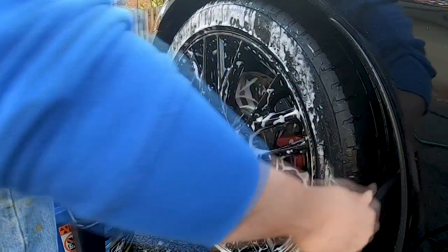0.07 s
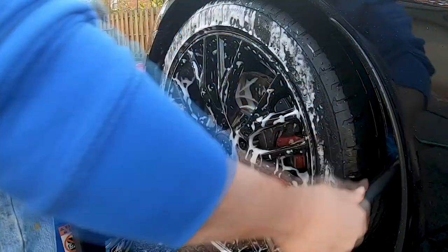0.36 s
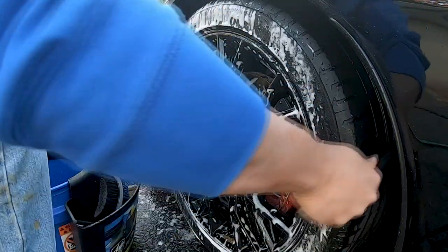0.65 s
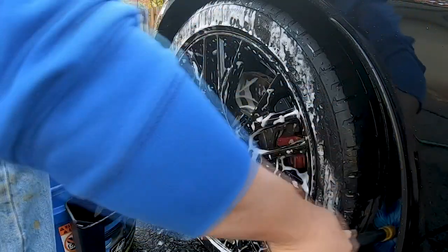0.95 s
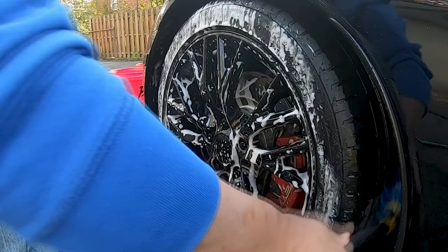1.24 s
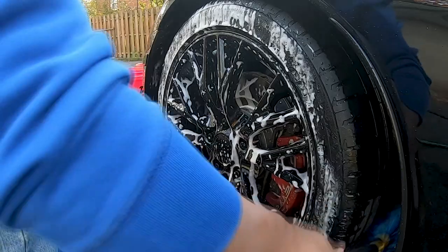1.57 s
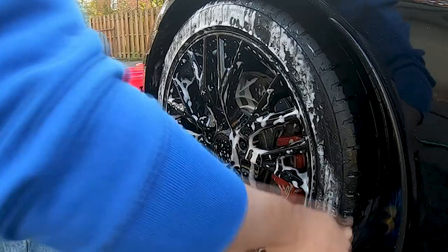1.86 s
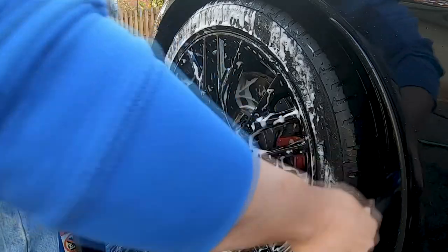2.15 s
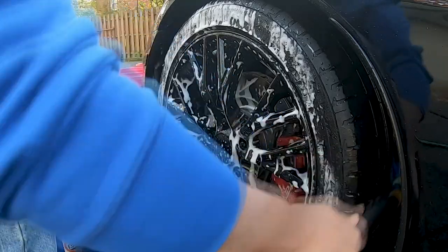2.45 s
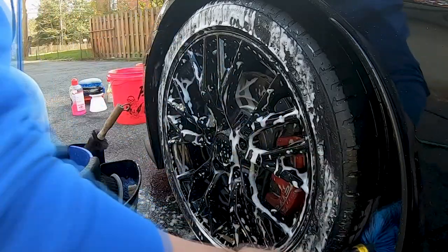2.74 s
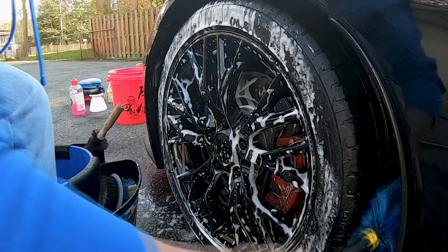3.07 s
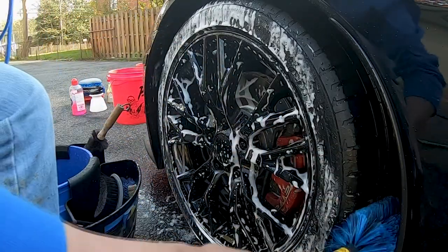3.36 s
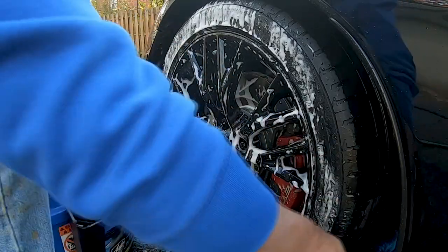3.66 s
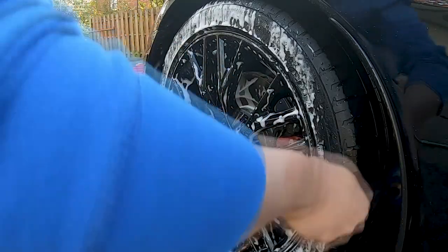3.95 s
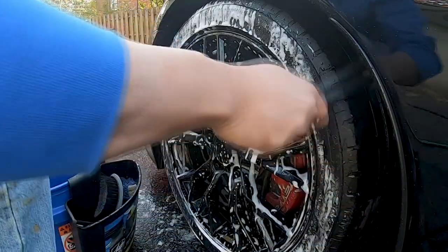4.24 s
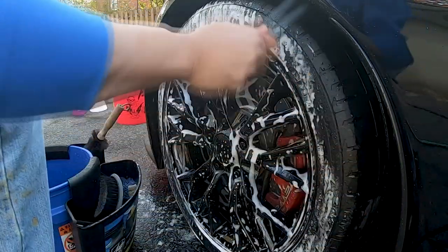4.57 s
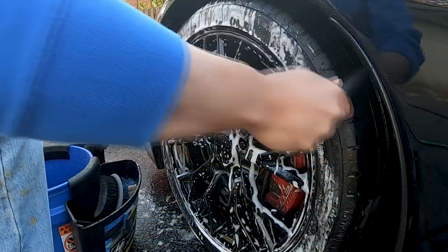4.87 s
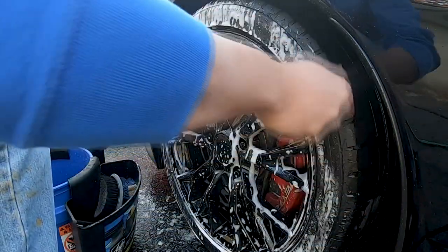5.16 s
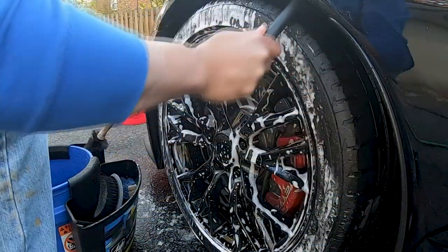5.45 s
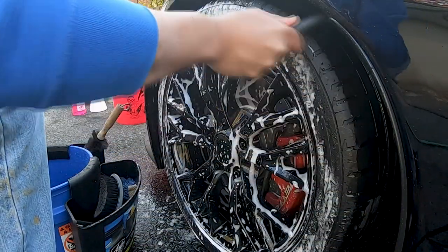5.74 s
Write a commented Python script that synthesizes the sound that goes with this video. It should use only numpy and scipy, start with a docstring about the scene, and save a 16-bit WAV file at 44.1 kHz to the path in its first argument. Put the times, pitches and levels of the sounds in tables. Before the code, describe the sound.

Close, wet bristles rub back and forth on a plastic wheel well liner, the brush head knocking against it, a distant engine idling underneath.

```python
"""A long-handled brush scrubs to and fro in a wet car wheel well, close by, outdoors.
Slipping bristles rub and hiss over the plastic liner and flick off its edges; the brush head knocks
and chatters on the liner, whose modes boom. Underneath: a faint hush and a distant engine that
settles from a fast idle to a slow one."""
import sys
import numpy as np
from scipy import signal
from scipy.fft import rfft, irfft, next_fast_len
from scipy.io import wavfile
from scipy.ndimage import uniform_filter1d

SR = 44100
rng = np.random.default_rng(int(sys.argv[2]) if len(sys.argv) > 2 else 0)


def log_audio(samples):
    """Write samples as a 16-bit WAV file to the path given in sys.argv[1]."""
    # one column per channel
    frames = np.atleast_2d(samples).T
    # limit to full scale, then quantise
    limited = np.clip(frames, -1, 1)
    pcm = np.round(limited * 32767).astype(np.int16)
    wavfile.write(sys.argv[1], SR, pcm)


N = 260410
TIME_S = np.arange(N) / SR
RING_S = np.arange(SR // 2) / SR

# stereo image: f/Hz, left minus right/dB, coherence/0-1
STEREO = [(100, -0.3, 1), (345, 0.6, 0.95), (690, -3.5, 0.72), (1220, -4.5, 0.44), (3070, -4, 0.82),
          (5040, -1, 0.76), (7900, -2.1, 0.01), (15000, 0.5, 0.4)]


def undb(db):
    """Decibels to gain."""
    return 10 ** (np.asarray(db) / 20)


def unit(x, size=None):
    """Scale to rms 1 over the first size samples."""
    return x / np.sqrt(np.mean(x[..., :size] ** 2))


def curves(table):
    """Table columns, interpolated over time."""
    s, *columns = np.transpose(table)
    return [np.interp(TIME_S, s, c) for c in columns]


def over_frequency(table, size):
    """Table columns, interpolated over log f onto FFT bins."""
    hz, *columns = np.transpose(table)
    log_bins = np.log(np.fft.rfftfreq(size, 1 / SR) + 1)
    return [np.interp(log_bins, np.log(hz), c) for c in columns]


def colour(x, outline):
    """Minimum-phase filter; outline: f/Hz, level/dB."""
    size = next_fast_len(x.shape[-1] // 2 + 2048) * 2
    cepstrum = irfft(np.log(undb(over_frequency(outline, size)[0])))
    cepstrum[1:size // 2] *= 2
    cepstrum[size // 2 + 1:] = 0
    return irfft(rfft(x, size) * np.exp(rfft(cepstrum)), size)[..., :x.shape[-1]]


def band(x, lo_hz, hi_hz):
    """Gentle band-pass."""
    return signal.sosfilt(signal.butter(2, [lo_hz, hi_hz], "band", fs=SR, output="sos"), x)


def spread(two):
    """Two independent signals to left and right, most alike in the bass."""
    size = two.shape[-1]
    coherence = np.clip(over_frequency(STEREO, size)[1], 0, .987)
    mid, side = rfft(two) * np.sqrt([(1 + coherence) / 2, (1 - coherence) / 2])
    return irfft(np.array([mid + side, mid - side]), size)


def walk(rate_hz):
    """Smooth random wander, rms 1."""
    hold = max(int(SR / rate_hz), 1)
    steps = np.repeat(rng.standard_normal(N // hold + 1), hold)
    return unit(uniform_filter1d(steps, hold)[:N])


def fade(t60_s):
    """Exponential decay, 60 dB in t60_s."""
    return np.exp(-np.log(1000) * RING_S / t60_s)


def add(out, start_s, sound):
    """Mix a sound in at start_s."""
    i = max(int(start_s * SR), 0)
    out[:, i:i + sound.shape[-1]] += sound[..., :N - i]


def stroke_levels(rest_rub_db=-61, rest_hiss_db=-71, last_turn_s=5.96):
    """Rub and hiss in dB: both follow the brush's speed, one arch per stroke."""
    # strokes, overlapping where the bristles flop over at a turn:
    # turn t/s, rub/dB, hiss/dB, fastest point/0-1, overlap each side of the turn/s
    strokes = [(0.0, -40.5, -46.5, 0.42, 0.14), (0.089, -39.3, -44.9, 0.54, 0.03),
               (0.295, -36, -40, 0.4, 0.03), (0.39, -39, -45.5, 0.5, 0.044),
               (0.562, -44, -47.5, 0.44, 0.0093), (0.753, -42.5, -49, 0.5, 0.014),
               (0.89, -44.5, -47.5, 0.69, 0.048), (1.12, -40, -44, 0.37, 0.049),
               (1.278, -39, -41.5, 0.81, 0.046), (1.395, -36.9, -43, 0.5, 0.017),
               (1.562, -39, -42.5, 0.47, 0.026), (1.684, -37, -43.2, 0.18, 0.012),
               (1.833, -37, -40.5, 0.52, 0.037), (1.937, -38.5, -43.5, 0.17, 0.014),
               (2.188, -41.5, -45.0, 0.67, 0.049), (2.346, -39, -44, 0.56, 0.015),
               (2.445, -39, -43.7, 0.7, 0.085), (2.706, -41.9, -45, 0.51, 0.028),
               (2.831, -40.5, -42, 0.86, 0.017), (2.947, -40, -42.8, 0.63, 0.022),
               (3.122, -38.5, -40.5, 0.88, 0.022), (3.333, -41.4, -43, 0.53, 0.031),
               (3.516, -38.5, -40, 0.4, 0.021), (3.785, -45, -51.2, 0.37, 0.019),
               (3.87, -37.5, -44.4, 0.3, 0.021), (3.9, -39, -44.3, 0.52, 0.043),
               (4.22, -44.5, -48.5, 0.29, 0.1), (4.445, -55, -59, 0.67, 0.039),
               (4.645, -43.3, -46.5, 0.56, 0.042), (4.777, -45.5, -48.5, 0.9, 0.0083),
               (4.87, -47.5, -52, 0.24, 0.028), (5.02, -46, -50, 0.92, 0.042),
               (5.163, -43.9, -53.5, 0.46, 0.03), (5.313, -45.5, -49, 0.65, 0.001),
               (5.438, -46.5, -49, 0.59, 0.019), (5.641, -43.5, -47.8, 0.53, 0.022),
               (5.773, -46, -52, 0.93, 0.043), (5.856, -47, -50.8, 0.4, 0.017)]
    rub_exponent, hiss_exponent = 1.52, 1.75
    lift_s, lift_half_s, lift_db = 4.455, 0.029, -4  # bristles lift off once; the hiss dips
    rub_power, hiss_power = undb(rest_rub_db) ** 2, undb(rest_hiss_db) ** 2
    next_turns = [(row[0], row[-1]) for row in strokes[1:]] + [(last_turn_s, 0)]
    for (start_s, rub_db, hiss_db, fastest, lead_s), (end_s, tail_s) in zip(strokes, next_turns):
        crest_s = start_s + fastest * (end_s - start_s)
        arch = np.interp(TIME_S, [start_s - lead_s, crest_s, end_s + tail_s], [0, np.pi / 2, np.pi])
        speed = np.maximum(np.sin(arch), 0)
        rub_power += (undb(rub_db) * speed ** rub_exponent) ** 2
        hiss_power += (undb(hiss_db) * speed ** hiss_exponent) ** 2
    lifted = np.exp(-((TIME_S - lift_s) / lift_half_s) ** 4)
    return 10 * np.log10(rub_power), 10 * np.log10(hiss_power) + lift_db * lifted


def slips(per_s, scatter_db, size=N):
    """Clicks of single bristles slipping, a few stronger than the rest."""
    hit = rng.random((2, size)) < per_s / SR
    strength = undb(scatter_db * np.minimum(rng.exponential(size=(2, size)), 5))
    return spread(hit * rng.choice([-1, 1], (2, size)) * strength)


def tyre_echo(x, delay_ms=2.6, swing_ms=0.535, gain=0.25):
    """Add a reflection off the tyre; its path moves with the brush, shifting the colour."""
    delayed_s = TIME_S - (delay_ms + swing_ms * walk(2.5)) / 1000
    return unit(x + gain * np.array([np.interp(delayed_s, TIME_S, channel) for channel in x]))


def panel_song(x):
    """Sharp resonances of the liner's panel, driven by rubbing."""
    # resonances: f/Hz, width/Hz, level/dB
    modes = [(1431, 63, 1), (1734, 130, -8), (2816, 62, -4.5), (3126, 44, -4.5), (3400, 140, -6.5),
             (4320, 200, -13)]
    return unit(sum(undb(db) * signal.lfilter(*signal.iirpeak(hz, hz / width_hz, fs=SR), x)
                    for hz, width_hz, db in modes))


def scrubbing(top_hz=9000, brighten=0.35):
    """Tufts catch and let go: shafts rub, wet tips hiss, the well and its panel answer."""
    # spectra of shafts, tips and well: f/Hz, level/dB
    rub_spectrum = [(700, -44), (1200, -14.5), (1600, 0), (2100, -1.5), (3100, -2.5), (3900, -7),
                    (4800, -11), (7000, -38)]
    hiss_spectrum = [(2800, -15), (4300, -9.5), (5200, -4), (7300, -2.5), (8700, -10.5), (10300, -11),
                     (11300, -18.5), (13000, -20.5), (15500, -44)]
    cavity_spectrum = [(100, -14.5), (230, -4), (330, -0.5), (450, -5), (540, 3.5), (680, 2.5), (880, -1),
                       (1060, -0.5), (1400, -2), (2500, -33.5)]
    # panel song at the brush's position: t/s, level re rub/dB
    singing = [(0, -12), (.35, -3.5), (1.5, -18), (3.3, -5), (4.0, -11), (4.27, -0.5), (4.55, -12),
               (5.0, -23), (5.2, 7), (5.35, -4), (5.9, -11)]
    rub_db, hiss_db = stroke_levels()
    cavity_db = -44.5 + 0.52 * (rub_db + 44)
    panel_gain = undb(curves(singing)[0])
    tufts = walk(110)
    rub = tyre_echo(colour(slips(per_s=7000, scatter_db=0.5), rub_spectrum))
    cavity = tyre_echo(colour(slips(per_s=4000, scatter_db=1.5), cavity_spectrum))
    panel = panel_song(colour(slips(per_s=8900, scatter_db=3.5), rub_spectrum))
    hiss = tyre_echo(colour(slips(per_s=23000, scatter_db=1.0), hiss_spectrum))
    # the panel draws its energy from rub and well
    cavity /= np.hypot(1, panel_gain)
    rub = (rub + panel_gain * panel) / np.hypot(1, panel_gain)
    # fast tips hiss brighter
    top = signal.sosfiltfilt(signal.butter(2, top_hz, "high", fs=SR, output="sos"), hiss)
    hiss += top * (undb(brighten * (hiss_db - np.median(hiss_db))) - 1)
    hiss[0] = np.roll(hiss[0], 2)  # tips lie to the right: left lags
    body = undb(rub_db) * rub + undb(cavity_db) * cavity
    return undb(1.07 * tufts) * body + undb(hiss_db + 0.81 * tufts) * hiss


def engine(fast_hz=61.5, slow_hz=52.6, settle_at_s=2.62, settle_tau_s=0.154):
    """Distant idle, slowing; only the lowest firing harmonics and a wavering rumble carry."""
    # engine levels: t/s, firing tone/dB, rumble/dB
    levels = [(0, -39, -32.5), (1.1, -45.5, -37.5), (1.5, -38.5, -29.5), (2.05, -28.5, -34.5),
              (2.8, -30, -30.5), (3.4, -28.5, -28), (4.05, -24, -33.5), (4.5, -35, -31.5),
              (5.9, -37.5, -37.5)]
    # rumble: f/Hz, level/dB
    spectrum = [(18, -20.5), (30, -0.5), (45, 4), (90, 5.5), (125, -7.5), (180, -9.5), (280, -21),
                (500, -30.5), (1500, -70)]
    tone_db, rumble_db = curves(levels)
    overtone_db = -42 + 0.36 * (tone_db + 31)
    firing_hz = slow_hz + (fast_hz - slow_hz) / (1 + np.exp((TIME_S - settle_at_s) / settle_tau_s))
    phase = 2 * np.pi * np.cumsum(firing_hz * (1 + 0.012 * walk(13))) / SR
    tone = unit(np.sin(phase)) * undb(tone_db + 1.5 * walk(14))
    overtones = unit(np.sin(2 * phase) + 0.23 * np.sin(3 * phase))
    noise = spread(rng.standard_normal((2, N)))
    rumble = unit(colour(noise, spectrum)) * undb(rumble_db + 1.5 * walk(12))
    return tone + overtones * undb(overtone_db + 1.8 * walk(15)) + rumble


def air(level_db=-56):
    """Faint, steady outdoor hush."""
    # hush: f/Hz, level/dB
    spectrum = [(100, -13), (500, -1.5), (1500, 1), (2500, -25), (5000, -34), (15000, -42)]
    noise = spread(rng.standard_normal((2, N)))
    return undb(level_db) * unit(colour(noise, spectrum))


def flicks(panel_gain=0.36):
    """Bent bristles spring off an edge in a short rasp that sets the panel singing."""
    # flicks: t/s, level/dB, rise/s, decay/s
    events = [(.008, -32.5, 0.007, 0.014), (1.217, -31.5, 0.0031, 0.015), (1.947, -38, .002, .016),
              (2.421, -24, .008, 0.017), (4.138, -32.5, 0.014, 0.016), (4.691, -26.5, .007, 0.034),
              (5.319, -35.5, 0.0031, .024), (5.813, -25, 0.0057, 0.017)]
    # rasp: f/Hz, level/dB
    spectrum = [(250, -12.5), (600, 6), (1100, -4), (1500, 2.5), (2100, -0.5), (3200, -2), (4500, -9),
                (7000, -8.5), (10000, -20.5), (15500, -34)]
    out = np.zeros((2, N))
    for start_s, db, rise_s, decay_s in events:
        attack = np.minimum(RING_S / rise_s, 1)
        release = np.exp(-(np.maximum(RING_S - rise_s, 0) / decay_s) ** 2)
        rasp = unit(colour(slips(per_s=9700, scatter_db=2.5, size=len(RING_S)), spectrum))
        add(out, start_s, undb(db) * attack * release * unit(rasp + panel_gain * panel_song(rasp)))
    return out


def chatter(span_ms, bounces=6):
    """Contact force: the head lands, then bounces ever more weakly within span_ms."""
    force = np.zeros(SR // 10)
    when = (np.arange(bounces) + rng.random(bounces)) / bounces
    at = np.clip((when * span_ms * SR / 1000).astype(int), 1, len(force) - 1)
    force[at] = rng.choice([-1, 1], bounces) * np.exp(-.6 * when) * min(span_ms / 9, 1)
    force[0] = 1
    return force[None]


def liner_modes(lo_hz, hi_hz, spot_hz, spot_db=7, spot_octaves=0.34, scatter_db=1.5, detune=0.017):
    """Modes in a range; the struck spot favours those near spot_hz and detunes each slightly."""
    # liner and cavity modes: f/Hz, level/dB, t60/s
    modes = [(38.1, -5.5, 0.31), (62.6, -7.5, 0.13), (125.7, 1.5, 0.18), (172.2, 0.5, 0.15),
             (226.7, 2, 0.068), (306, -8, 0.11), (333.5, -11.5, 0.061), (438, -7, 0.16), (535, 5, 0.1),
             (573, 7, 0.082), (720, -15, 0.31), (935, -8.5, 0.25), (1160, -18, 0.053), (1415, 7, 0.042),
             (1713, 3, 0.027), (1813, 5.5, 0.068), (2420, -2, 0.037), (2910, 1.5, 0.073),
             (3100, -18, 0.027)]
    out = np.zeros(len(RING_S))
    for (hz, db, t60_s), (weight, tune) in zip(modes, rng.standard_normal((len(modes), 2))):
        if lo_hz <= hz < hi_hz:
            nearness = np.exp(-(np.log2(hz / spot_hz) / spot_octaves) ** 2)
            gain = undb(db + scatter_db * weight + spot_db * nearness)
            out += gain * fade(t60_s) * np.sin(2 * np.pi * hz * (1 + detune * tune) * RING_S)
    return out


def echoes(t60_s):
    """Dense, short reflections between liner and tyre."""
    return spread(rng.standard_normal((2, len(RING_S)))) * fade(t60_s)


def contact_crack(spot_hz, hard_db, size):
    """Direct tick, first reflections, high modes and the well's wash; hard contacts are brighter."""
    # crack: f/Hz, level/dB
    spectrum = [(400, -25.5), (900, 12.5), (1400, 8.5), (1900, 3), (3500, -3.5), (4700, -15.5), (6000, -18),
                (8500, -25), (11500, -65), (15000, -71)]
    outline = [(hz, db + hard_db * np.interp(hz, [2300, 4700, 11000], [0, 1, 0])) for hz, db in spectrum]
    tick = unit(colour(signal.unit_impulse(len(RING_S)), outline), size)
    early = unit(colour(echoes(t60_s=0.0066), outline), size)
    wash = unit(colour(echoes(t60_s=0.09), outline), size)
    high_modes = unit(liner_modes(1080, 5000, spot_hz), size)
    return 0.52 * tick + 0.49 * early + 0.22 * high_modes + .5 * wash


def knocks(size=1100, mid_spot_hz=302):
    """Each blow of the head flexes the liner, thumps its low modes, rings the middle ones and cracks."""
    # blows: t/s, blow/dB, crack/dB, chatter/ms, spot's favoured f/Hz, hardness/dB
    blows = [(.060, -45, -59, 9.1, 119, 0), (0.5106, -16.5, -38, 6.4, 235, 1),
             (0.5216, -18.5, -22.5, 2.7, 135, -1.5), (1.218, -22.5, -40, 11.1, 362, 16),
             (1.314, -30.5, -56, 10, 198, 0), (1.535, -25.5, -45, 7.5, 380, -4),
             (1.579, -21.5, -32, 9, 468, -26), (1.607, -28.5, -48, 6.4, 170, 0),
             (1.901, -25.5, -52, 10.8, 157, 3), (4.386, -24, -35, 2.23, 221, 11),
             (4.4946, -26.5, -33.5, 0.78, 440, -4), (4.5455, -23.5, -49, 8.1, 139, -9),
             (4.659, -27.5, -34.5, 5, 241, -17), (4.686, -30.5, -36, 15.3, 380, -9),
             (4.861, -19, -27.5, 1.17, 325, -6.5), (4.903, -31, -40, 16.4, 450, -8),
             (4.9226, -18.5, -47, 5, 196, -5), (4.926, -18.5, -23.5, 11, 534, -3.5),
             (5.3092, -18, -29.5, 2.66, 212, 18.5), (5.697, -19.5, -26, 1.15, 343, -5),
             (5.7629, -20, -26, 9, 546, -10), (5.809, -26, -38, 8.4, 200, -6)]
    out = np.zeros((2, N))
    for start_s, blow_db, crack_db, chatter_ms, spot_hz, hard_db in blows:
        # a stiff, high-pitched spot flexes less and rings more
        octaves = np.log2(spot_hz / mid_spot_hz)
        flex_db = blow_db - 0.5 - octaves
        ring_db = blow_db - 7 + 8 * octaves
        force = chatter(chatter_ms)
        # heavy low modes build up slowly
        flex = liner_modes(20, 90, spot_hz) * (1 - np.exp(-RING_S / 0.0052))
        low_modes = liner_modes(90, 380, spot_hz) * (1 - np.exp(-RING_S / 0.0027))
        thump = unit(low_modes, size) + .5 * unit(band(echoes(t60_s=0.21), 128, 289), size)
        mid_modes = liner_modes(380, 1080, spot_hz)
        ring = unit(mid_modes, size) + 0.61 * unit(band(echoes(t60_s=0.085), 413, 840), size)
        crack = contact_crack(spot_hz, hard_db, size)
        add(out, start_s, undb(flex_db) * unit(flex, size))
        for part, db in (-thump, blow_db), (ring, ring_db), (crack, crack_db):
            struck = signal.fftconvolve(part, force, axes=1)[:, :len(RING_S)]
            add(out, start_s, undb(db) * unit(struck, size))
    return out


def scene():
    """The well lies to the right, which shades the left channel's midrange."""
    mix = scrubbing() + flicks() + knocks() + engine() + air()
    balance_db = over_frequency(STEREO, N)[0]
    return irfft(rfft(mix) * undb([balance_db / 2, -balance_db / 2]), N)


def record(dry):
    """Low cut, soft clipping of peaks, steep top cut."""
    low_hz, top_hz, drive = 24, 15500, .6
    x = signal.sosfilt(signal.butter(2, low_hz, "high", fs=SR, output="sos"), dry)
    x = np.tanh(drive * x) / drive
    return signal.sosfilt(signal.ellip(10, .2, 80, top_hz, fs=SR, output="sos"), x)


dry = scene()
out = record(dry)
log_audio(out)
```